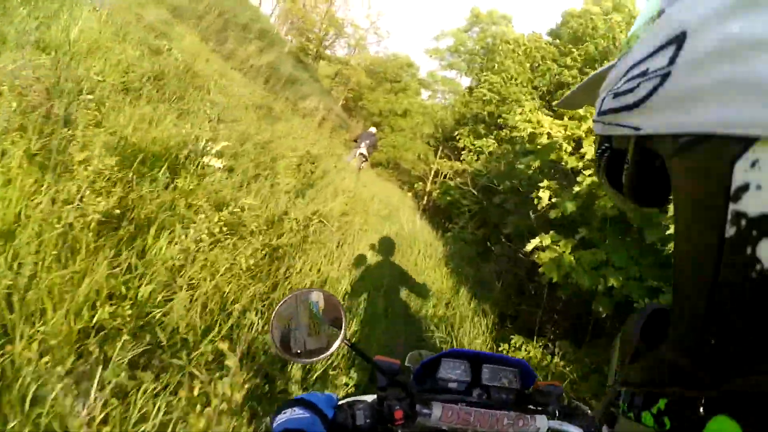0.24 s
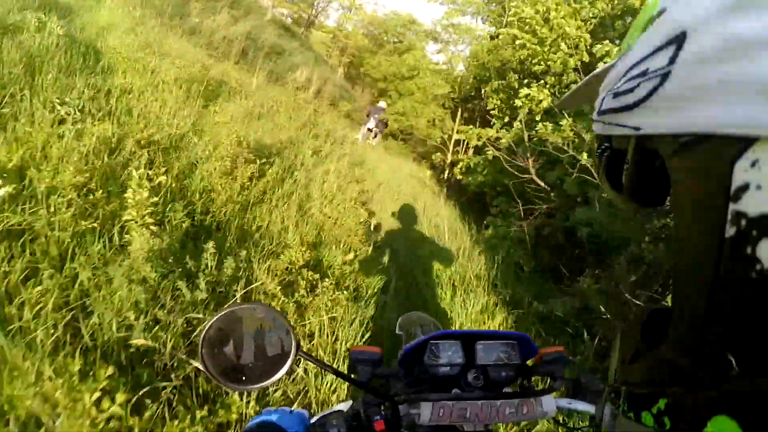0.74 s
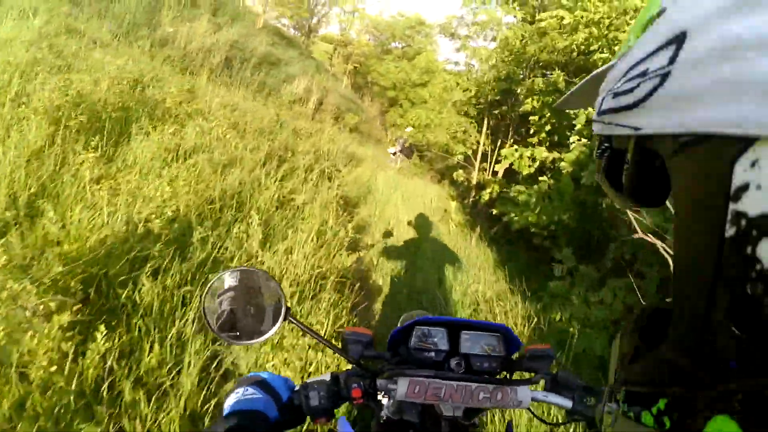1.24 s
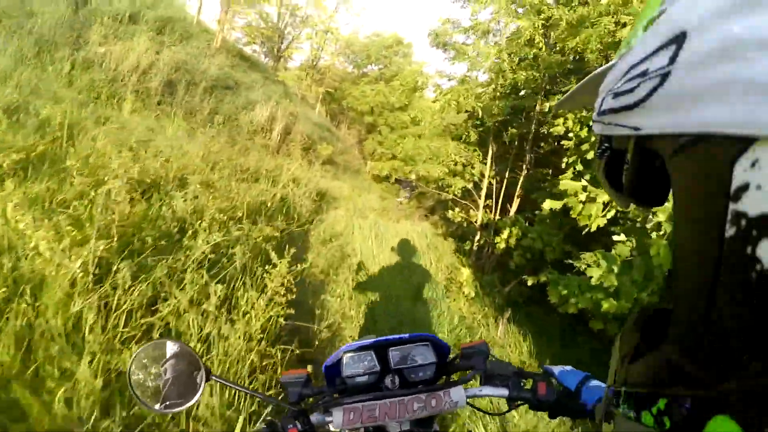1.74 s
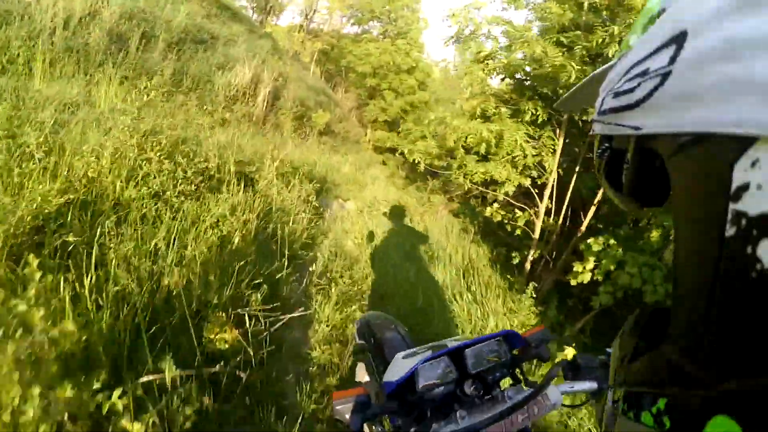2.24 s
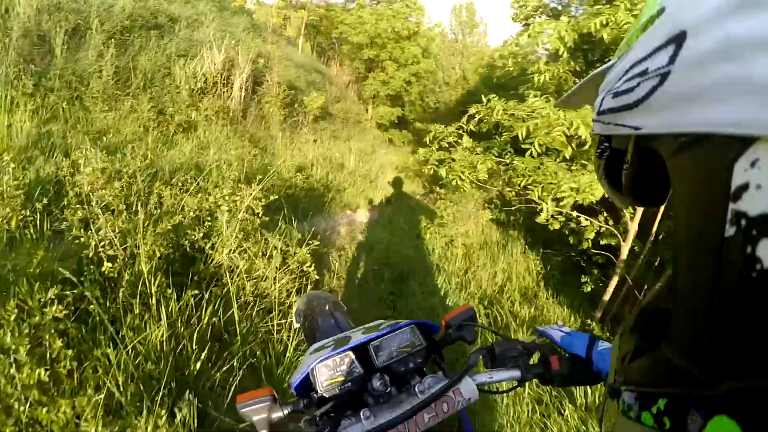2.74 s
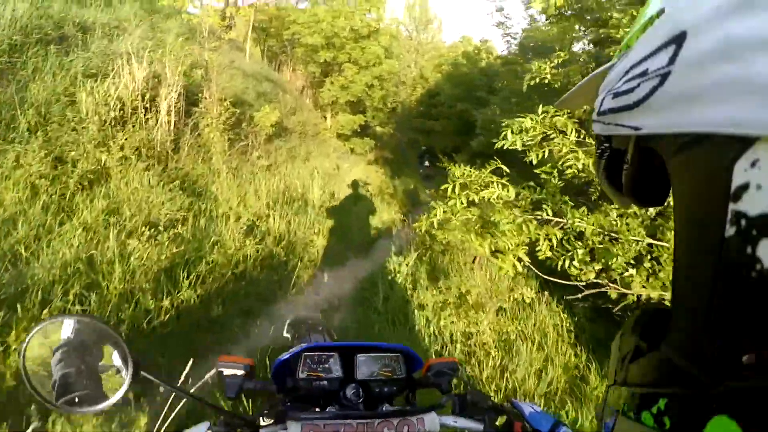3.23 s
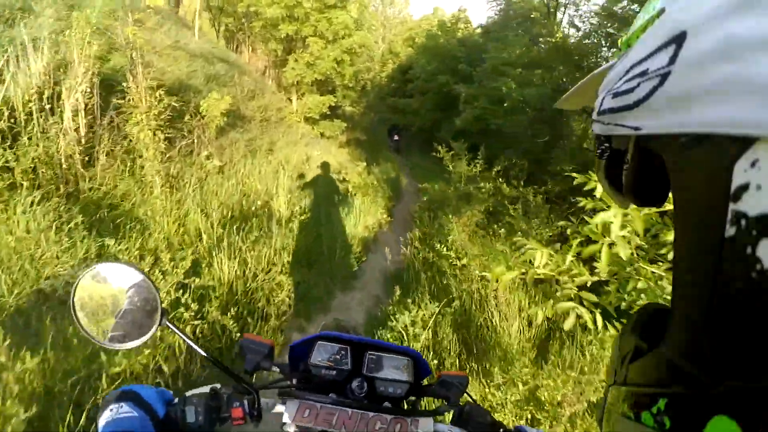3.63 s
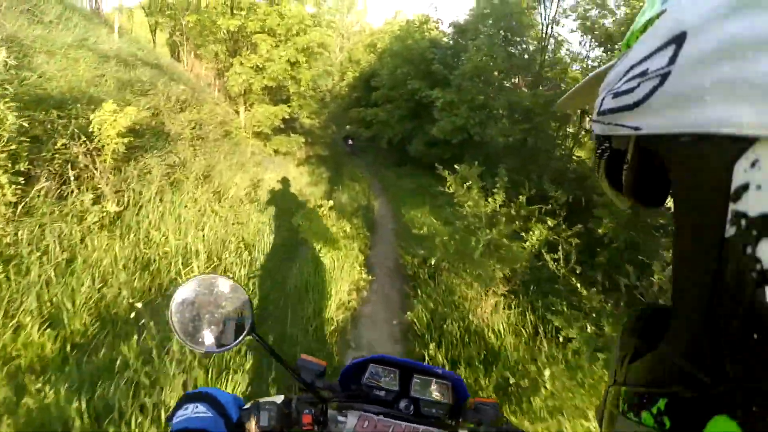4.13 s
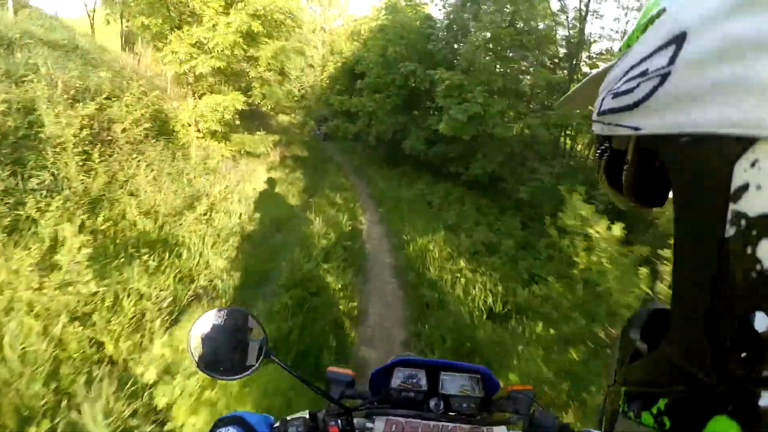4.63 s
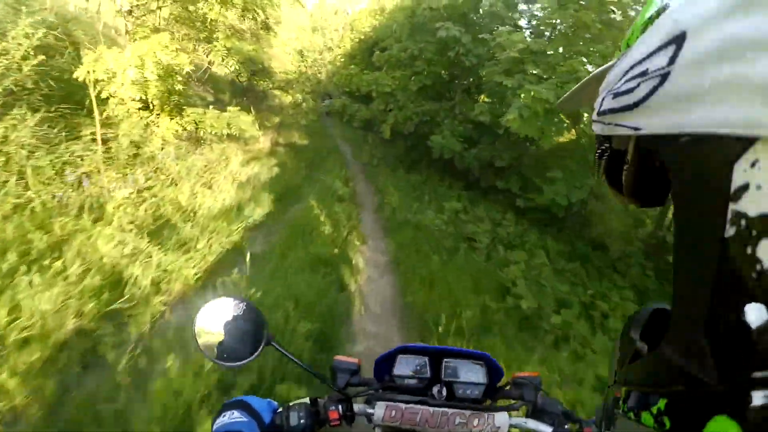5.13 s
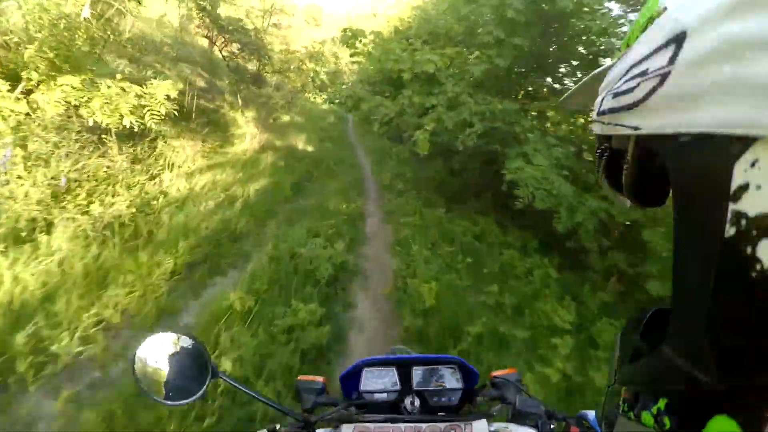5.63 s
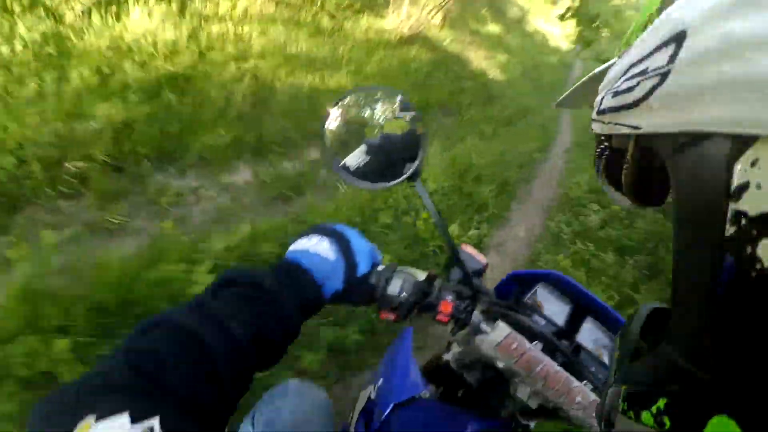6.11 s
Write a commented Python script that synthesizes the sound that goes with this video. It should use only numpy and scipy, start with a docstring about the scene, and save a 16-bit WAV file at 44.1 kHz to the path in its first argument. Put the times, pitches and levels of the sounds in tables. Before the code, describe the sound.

From the rider's helmet outdoors, a small two-stroke trail bike pulls gently with a nasal, rough buzz and thin metallic rattle, over low swaying wind. Small thuds and chain slaps come near 0.5 s. From about 0.9 s the throttle closes and the pitch slides down, the drone fading out by 1.9 s. At 2 s a big bump gives a very deep boom and wind buffet, with grass sweeping and a short faint brake squeal. From 2 to 4.7 s the bike coasts slowly with irregular soft pops and rasps, loose knocks, faint snapping stems and another weak squeal near 3.7 s. From 4.8 to 5.9 s it rolls faster: hollow chain slaps cluster, thuds land, pops continue and wind rumble grows. From 6 s to the end at about 6.4 s, hard knocks, gritty tyre scrubbing, a brief high brake scrape and a gust crowd together.

```python
"""Small two-stroke trail bike on rough grass

Heard from the rider's helmet: it pulls gently, the throttle closes, and it coasts on with stray pops.
Exhaust harmonics and gas noise pass through pipe resonances; piston slaps ring the metal as a rattle.
Bumps boom and knock and the chain slaps, as decaying tones and noise bursts through resonances.
Tyres, grass, twigs and a late scrub are shaped noise; brakes sing as wavering tones with scrape.
Wind is low noise that sways and rumbles on the microphone, growing with the pace and in gusts."""
import sys
import numpy as np
from scipy import signal
from scipy.fft import rfft, irfft, next_fast_len
from scipy.io import wavfile
from scipy.ndimage import uniform_filter1d

SR = 44100
rng = np.random.default_rng(int(sys.argv[2]) if len(sys.argv) > 2 else 0)


def generate_wav(sig):
    """Save sig (samples, or channels by samples) to the path in sys.argv[1] as 16-bit PCM at SR."""
    pcm = np.round(np.clip(np.atleast_2d(sig).T, -1, 1) * 32767).astype(np.int16)
    wavfile.write(sys.argv[1], SR, pcm)


N = 280917
TIME = np.arange(N) / SR  # s
HIT_SIZE = 8192  # samples in a short sound
TOP_HZ = 15200
SLOW_M_S, IDLE_HZ = 3, 21  # reference pace and reference turns per second

# levels at the slow pace [dB], and their rise for each doubling of speed [dB]; drive also follows the revs
GROUND_DB, GROUND_RISE_DB = -74, 15
DRIVE_DB, DRIVE_RISE_DB = -70.5, 5.5
WIND_DB, WIND_RISE_DB = -61.5, 9
SWAY_DB, SWAY_RISE_DB = -41.5, 3.5
# engine rattle at idle [dB], and its rise for each doubling of the revs [dB]
RATTLE_DB, RATTLE_RISE_DB = -70, 6
# weak firings: chance on each turn, then bark and rasp levels before scatter and the trims in pops()
WEAK_CHANCE, WEAK_DB, WEAK_RASP_DB = .15, -75, -65

# In swell tables, half length is the time from the height to a fall of 1/e.
# Resonance levels and spectrum levels are relative within their table.

# engine under power: (time [s], firing rate [Hz])
POWER_REVS = [(0.06, 57.15), (0.174, 55.55), (0.304, 55.0), (0.45, 56.2), (0.716, 56), (0.902, 54.43),
              (0.972, 52.87), (1.342, 45.06), (1.548, 39.9), (1.8, 34.38)]
# crank while coasting: (time [s], turns per second [Hz])
COAST_REVS = [(1.9, 32.08), (2.5, 27.29), (3.3, 20.78), (4.2, 21.31), (5, 25.88), (6.37, 31.46)]
# exhaust under power: (time [s], level [dB])
EXHAUST_LOAD = [(0, -60), (.92, -59.5), (1.1, -56), (1.38, -60), (1.68, -62.5), (1.76, -64.5), (1.9, -100)]
# pace over the ground: (time [s], speed [m/s])
GROUND_SPEED = [(0, 3.77), (1.2, 2.33), (2.0, 4.45), (3.0, 2.9), (3.95, 3.42), (4.65, 4.4), (5.0, 5.45),
                (5.7, 6.53), (6.37, 5.24)]

# exhaust resonances under power: (frequency [Hz], width at -6 dB [Hz], level [dB])
PIPE_MODES = [(111.5, 17, 2.5), (167.6, 23, -4), (230, 34, -7.5), (272.6, 40, 1.5), (303.2, 22.3, 10),
              (376, 32, -27), (461, 37, -18), (510.6, 36, 1.5), (557, 19, -1.5), (607, 49, 1.5),
              (671, 24, -1.5), (830, 56, -9), (938, 57, -1.5), (1030, 28, -5), (1070, 39, -14),
              (1105, 42, -6), (1350, 110, -11), (1480, 36, -19), (1630, 77, -11.5), (2020, 100, -29)]
# cylinder fins and casings: (frequency [Hz], width [Hz], level [dB])
METAL_MODES = [(1504, 49, -1.5), (1950, 25, -4), (2506, 94, 3), (2890, 180, -1), (3285, 144, 2),
               (3576, 580, 6), (4200, 195, 11), (5360, 400, -9), (6120, 120, -13), (6680, 690, -4.5),
               (7510, 270, -8), (8170, 200, -5), (10100, 320, -4.5), (11440, 1200, -5.5)]
# fins that sing in part of the rev range:
# (frequency [Hz], width [Hz], level [dB], at firing rate [Hz], spread as standard deviation [Hz])
SINGING_FINS = [(4220, 130, -69.5, 58.4, 3.2), (3224, 38, -70, 49.9, 3.8), (3480, 51, -76, 43.6, 7.3),
                (1870, 150, -74.5, 47.3, 6.8), (1340, 70, -77, 55.5, 3)]
# ring of a lone firing in the silencer: (frequency [Hz], width [Hz], level [dB])
BARK_MODES = [(163, 36, -7.5), (224, 21, -17.5), (296.7, 22.2, -6), (567.6, 54, 1), (629, 40, -5),
              (895, 79, -16), (1057, 25, -28)]
# ring of cylinder and airbox in a lone firing: (frequency [Hz], width [Hz], level [dB])
RASP_MODES = [(910, 70, 5.5), (1477, 120, -5), (1930, 91, 2.5), (2870, 520, 5.5), (3650, 320, 6),
              (4170, 160, 1), (7000, 790, -16), (8060, 160, -6), (11200, 2500, -24)]
# chain guard and swingarm: (frequency [Hz], width [Hz], level [dB])
GUARD_MODES = [(200, 45, 4), (583, 64, 3), (641, 51, 6.5), (714, 100, -26), (1062, 58, -5.5)]
# ring of the scrubbing tyre and rim: (frequency [Hz], width [Hz], level [dB])
TYRE_MODES = [(660, 63, -4), (860, 64, -5), (1076, 90, 2), (3280, 310, -7), (4300, 190, -7)]

# strong stray firings, before the trims in pops(): (time [s], bark peak [dB], rasp peak [dB])
STRONG_POPS = [(1.775, -57, -65), (1.833, -53.5, -76), (1.92, -48.5, -66), (2.015, -44.5, -61),
               (2.224, -49, -67), (2.46, -53, -58.5), (2.584, -48.5, -54.5), (2.724, -51, -67),
               (2.868, -51.5, -71), (3.009, -52.5, -70), (3.109, -49, -57), (3.256, -50, -53),
               (3.402, -52, -65), (3.502, -56, -75), (3.6, -51, -60), (3.744, -51, -56.5),
               (3.886, -52.5, -55.5), (4.032, -56, -65), (4.231, -47.5, -57.5), (4.372, -53, -62),
               (4.516, -52, -56.5), (4.663, -55, -61), (5.204, -54, -58), (5.35, -61, -59),
               (5.533, -51, -63), (5.581, -54, -58.5), (5.699, -58, -56), (5.898, -54, -57.5),
               (6.121, -49, -77)]
# loose parts knocking, before the trim in bumps():
# (time [s], peak [dB], decay [s], treble tilt [dB per octave])
LOOSE_KNOCKS = [(1.976, -51, 0.0059, -3), (2.101, -53, 0.0022, 5), (2.699, -53, 0.0041, 0),
                (2.957, -57, 0.0026, -8), (3.111, -48.5, 0.0053, 6), (3.308, -54, 0.0036, 3),
                (3.377, -56.5, 0.014, 3.5), (3.747, -61, 0.0066, 10), (3.913, -55, 0.016, -13),
                (4.977, -51, 0.0061, -5), (5.287, -51, 0.011, -8), (5.329, -53, 0.0051, -9),
                (5.811, -52, 0.009, -8), (6.066, -48, 0.0035, -15), (6.097, -54, 0.0037, -13),
                (6.114, -41.5, 0.0044, -13), (6.188, -53, 0.0055, -22), (6.254, -41, 0.0017, -13)]
# suspension thuds: (time [s], peak [dB], pitch [Hz])
SUSPENSION_THUDS = [(0.503, -53.5, 183), (0.619, -56, 198), (1.458, -60, 119.2), (2.025, -60.5, 190),
                    (2.055, -44, 111), (2.062, -51.5, 166), (2.065, -54, 239.5), (2.2, -59, 160),
                    (2.589, -64, 136), (2.955, -57.5, 191), (4.276, -53.5, 220), (4.87, -58, 186),
                    (4.963, -51, 212), (5.591, -61, 210.8), (5.786, -47, 160), (6.04, -58, 293),
                    (6.14, -51.5, 215), (6.2, -46, 182), (6.272, -53.5, 297), (6.342, -52, 302)]
# the helmet jolted by big bumps: (time at the height [s], half length [s], peak [dB], pitch [Hz])
HELMET_BOOMS = [(1.124, 0.027, -41.5, 36), (1.997, 0.037, -27, 30), (2.056, 0.03, -14, 14.3),
                (2.087, 0.038, -45, 48), (2.283, 0.094, -51, 40), (2.365, 0.025, -30, 26),
                (2.595, 0.055, -36, 16), (2.719, 0.068, -40.5, 29)]
# the slack chain slapping its guard over ruts: (time [s], peak [dB])
CHAIN_SLAPS = [(0.4, -54), (0.505, -51), (4.232, -56), (4.271, -53), (4.291, -56), (4.856, -59),
               (4.873, -47.5), (4.891, -50), (4.937, -47.5), (4.956, -46.5), (4.971, -58), (4.986, -52),
               (5.056, -60), (5.177, -47), (5.242, -53), (5.346, -53.5), (5.534, -47.5), (5.712, -49),
               (5.725, -47.5), (5.788, -44.5), (5.808, -48), (5.841, -54), (5.855, -52), (5.883, -49)]
# brakes singing briefly: (start [s], length [s], pitch [Hz], level at the height [dB])
BRAKE_SQUEALS = [(2.146, 0.14, 914, -64), (3.643, 0.33, 892, -74), (6.272, 0.055, 5500, -69)]
# tyres scrubbing into the turn: (time at the height [s], half length [s], level [dB])
TYRE_SCRUBS = [(6.08, 0.059, -56), (6.194, 0.01, -54), (6.275, 0.06, -55.5), (6.345, 0.029, -52),
               (6.378, 0.025, -46.5)]
# tall grass sweeping along the bike: (time at the height [s], half length [s], level [dB])
GRASS_SWEEPS = [(2.2, 0.16, -63), (2.24, 0.034, -58), (2.85, 1, -74.5), (5.4, 0.7, -77.5),
                (6.29, 0.067, -71), (6.37, 0.021, -64)]
# gusts on the microphone, the sway stretched further in wind():
# (time at the height [s], half length [s], rumble [dB], slow sway [dB])
WIND_GUSTS = [(0, 0.035, -49, -35.5), (0.148, 0.059, -55, -70), (0.607, 0.05, -61, -32.5),
              (0.852, 0.028, -49, -45), (1.274, 0.45, -57, -42.5), (1.844, 0.033, -46, -49),
              (2.034, 0.046, -32, -18), (2.274, 0.16, -43, -26.5), (2.618, 0.067, -53, -26.5),
              (3.114, 0.19, -55.5, -30.5), (3.477, 0.15, -62, -36), (4.134, 0.044, -54, -45),
              (4.288, 0.1, -64, -32.5), (4.987, 0.14, -50, -53), (5.359, 0.33, -52.5, -32.5),
              (5.606, 0.054, -50, -34.5), (5.924, 0.15, -45.5, -34.5), (6.214, 0.016, -53, -17),
              (6.275, 0.05, -40, -36)]

# slow pressure sway of the wind: (frequency [Hz], spectrum level [dB])
SWAY_COLOUR = [(1, -2), (4, -8.5), (7, 1), (11, 1), (18, -15), (30, -45.5), (60, -138.5)]
# wind rumble: (frequency [Hz], spectrum level [dB])
RUMBLE_COLOUR = [(10, -32), (22, -2), (40, -2), (53, -8), (68, -50.5), (110, -28.5), (600, -111)]
# tyres drumming on the ground: (frequency [Hz], spectrum level [dB])
GROUND_COLOUR = [(30, -26), (65, 6), (105, 7.5), (150, -1), (220, -6.5), (380, -49), (1000, -41.5)]
# chain and gears churning: (frequency [Hz], spectrum level [dB])
DRIVE_COLOUR = [(120, -28), (230, 2), (305, 5), (385, -11), (500, 1.5), (680, 0.5), (780, -5), (900, -1.5),
                (1060, 1), (1230, -10), (1500, -6.5), (2050, -18), (5000, -16), (15000, -33)]
# hiss of a knocking part: (frequency [Hz], spectrum level [dB])
HISS_COLOUR = [(500, -28), (1500, -2), (2800, 1.5), (4300, 18), (5500, -12), (8300, 16), (9300, -33),
               (10500, -22), (15000, -46)]
# grass and snapping stems: (frequency [Hz], spectrum level [dB])
GRASS_COLOUR = [(800, -41), (2500, -11.5), (4200, -0.5), (6000, -10.5), (8300, -10.5), (11000, -17.5),
                (15000, -19.5)]
# grit under the scrubbing tyres: (frequency [Hz], spectrum level [dB])
SCRUB_COLOUR = [(250, -26), (550, 0), (800, 7.5), (1100, 14.5), (1600, 3), (2500, 2), (4000, 3),
                (5000, -5.5), (7000, -25), (10000, -37), (15000, -32)]


def exhaust(hz, turns, gas_db=-10.5, gas_turns=0.97, waver_db=4.5, dull_db=14, odd_db=-4, count=36):
    """The harmonics of the firing rate slide through the pipe's resonances; rough gas follows each firing."""
    grid = np.arange(1, SR / 8)
    pipe = pipe_gain(grid)
    live = TIME < EXHAUST_LOAD[-1][0]
    revs = hz[live]
    strength = flutter(50, 1.6)[live]
    tone = np.zeros(N)
    for k in range(1, count + 1):
        # random phases: the silencer smears each firing over the whole turn
        phase = 2 * np.pi * (k * turns[live] + rng.random())
        # the low harmonics hold steady, the upper ones waver
        unsteady = np.clip((k - 7) / 10, .12, 1.1)
        waver = (strength * flutter(22.504, waver_db)[live]) ** unsteady
        # the harmonics above 600 Hz fade as the revs fall
        octaves_up = np.log2(np.maximum(k * revs / 600, 1))
        dull = undb(dull_db * np.log2(revs / hz[0]) * octaves_up)
        # the port opens and shuts on each turn: two jolts, which favour the even harmonics
        parity = undb(odd_db * (k % 2))
        tone[live] += parity * np.interp(k * revs, grid, pipe) * dull * waver * np.sin(phase)
    puffs = noise() * np.exp(-(turns % 1) / gas_turns)
    puffs = colour(puffs, [(100, 1), (200, -6.5), (350, -12), (600, 2.5), (1000, 0.5), (1500, 14.0),
                           (2500, -11), (6000, -5)])
    puffs = padded(puffs)
    gas = irfft(rfft(puffs) * pipe_gain(freqs(puffs)))[:N]
    # the gas flow falls with the revs
    flow = undb(gas_db) * unit(gas) * (hz / hz[0]) ** 2
    return (even(tone, 0.075) + flow) * undb(curve(EXHAUST_LOAD))


def pipe_gain(f):
    """Each resonance acts twice, in pipe and silencer, so the valleys between them are deep."""
    return sum(undb(db) / (1 + ((f * f - hz * hz) / (f * width)) ** 2) for hz, width, db in PIPE_MODES)


def pumping(turns, level_db=-75, puff_turns=0.62, speed_db=0.41, shut_s=1.04):
    """With the throttle closing, the piston still pumps a soft puff of air through the pipe on every turn."""
    puffs = noise() * np.exp(-(turns % 1) / puff_turns) * flutter(25, 1.8)
    air = ring(puffs, [(306.0, 64, 2.5), (387.0, 21, -3.5), (422.0, 19, -16), (652.0, 180, -6),
                       (856.0, 24, 1.5), (1410, 46, -22)])
    air = colour(air, [(950, 11), (1200, -15), (1450, 5), (2000, -26)])
    closed = np.clip(TIME - shut_s, 0, 1)  # fades in over one second
    revs = curve(COAST_REVS)
    return unit(air) * undb(level_db + speed_db * (revs - revs.min())) * closed


def rattle(hz, turns, slap_turns=0.33, slap=1.5, scatter_db=6.5):
    """The piston slaps twice a turn and rings the metal, louder with the revs; some fins sing at certain revs."""
    slap_decay = np.exp(-(2 * turns % 1) / slap_turns)
    slaps = 1.5 + slap * slap_decay * np.tanh(flutter(60, scatter_db))
    metal = ring(noise() * slaps * flutter(35, 1.0), METAL_MODES)
    metal = colour(metal, [(500, 12), (1400, 4), (9000, -2.5), (12500, -10.0), (15000, -7.5)])
    out = metal * undb(RATTLE_DB + RATTLE_RISE_DB * np.log2(hz / IDLE_HZ))
    for fin_hz, width, db, revs, spread in SINGING_FINS:
        fin = ring(noise() * slaps * flutter(47.9, 2.0), [(fin_hz, width, 0)])
        fin = ring(fin, [(fin_hz, 600, 0)])  # a broad second pass thins the skirts
        near = np.exp(-((hz - revs) / spread) ** 2 / 2)
        out = out + unit(fin) * undb(db) * near
    return out


def pops(crank_hz, turns, bark_trim_db=-1, rasp_trim_db=6.0, crackle_db=16, vary_db=2, lead_s=.001,
         gas_share=0.35, tilt_db=2.2, even_hz=28):
    """Unburnt charge fires now and then: a soft bark in the pipe and a rasp from the cylinder."""
    out = np.zeros(N)
    t = TIME[:HIT_SIZE]
    for s, bark_db, rasp_db in list(STRONG_POPS) + weak_firings(turns):
        # a slow crank opens the port gently, so the bark is deeper
        tilt = tilt_db * np.clip(np.interp(s, TIME, crank_hz) - even_hz, -2, 4)  # dB per octave
        bark = 0
        for hz, width, gain in BARK_MODES:
            size = undb(gain + tilt * np.log2(max(hz / 300, 1)) + rng.standard_normal())
            phase = hz * (1 + 0.0089 * rng.standard_normal()) * t + rng.random()
            bark = bark + size * np.exp(-np.pi * width * t) * np.sin(2 * np.pi * phase)
        bark = bark * (1 - np.exp(-(t / 0.0052) ** 2))
        gas = colour(burst(0.0017, 0.0088), [(100, -33), (300, -8), (650, 7.0), (1000, -1.0), (2000, 10.5)])
        gas = ring(gas, BARK_MODES)
        add(out, s - lead_s, peak(unit(bark) + gas_share * unit(gas), bark_db + bark_trim_db))
        # the charge burns in crackles, and no two firings ring alike
        crackle = burst(0.0017, 0.018) * undb(crackle_db * np.tanh(noise(HIT_SIZE) / 2))
        modes = [(hz, width, gain + vary_db * rng.standard_normal()) for hz, width, gain in RASP_MODES]
        add(out, s - lead_s, peak(ring(crackle, modes), rasp_db + rasp_trim_db))
    return out


def weak_firings(turns, scatter_db=2):
    """Once the throttle is shut, any turn of the crank may fire feebly: rows like those of STRONG_POPS."""
    starts = TIME[1:][np.diff(np.floor(turns)) > 0]
    starts = starts[starts > POWER_REVS[-1][0]]
    luck = rng.random(256)
    spread = scatter_db * noise(256)
    return [(s, WEAK_DB + off, WEAK_RASP_DB + off)
            for s, draw, off in zip(starts, luck, spread) if draw < WEAK_CHANCE]


def booms():
    """The big bumps shake the helmet through a few deep swings."""
    return sum(swells([(s, half_s, db)]) * np.cos(2 * np.pi * hz * (TIME - s))
               for s, half_s, db, hz in HELMET_BOOMS)


def bumps(knock_trim_db=2.5, hiss=0.99, snap=3.8):
    """Ruts thump the frame and make loose parts knock."""
    out = np.zeros(N)
    for s, db, decay_s, tilt in LOOSE_KNOCKS:
        # one hard strike amid a short chatter of the part
        strike = signal.unit_impulse(HIT_SIZE, 64)
        contact = snap * strike + burst(0.0011, decay_s)
        knock = unit(ring(contact, METAL_MODES)) + hiss * colour(contact, HISS_COLOUR)
        slope = [(2500, -tilt), (10000, tilt)]  # two octaves apart
        add(out, s, peak(colour(knock, slope), db + knock_trim_db))
    for s, db, hz in SUSPENSION_THUDS:
        add(out, s, peak(thump(hz), db))
    return out


def thump(hz, rise_s=0.0079, decay_s=0.016, rough=1.0):
    """The suspension takes a blow and the frame swings a few times at one pitch, with a rough noisy push."""
    t = TIME[:HIT_SIZE]
    swing = np.sin(2 * np.pi * hz * t) * (1 - np.exp(-(t / rise_s) ** 2)) * np.exp(-t / decay_s)
    push = colour(burst(0.0026, 0.013), [(50, 6), (100, 12.5), (260, -0.5), (400, -7.5), (2000, -5)])
    return unit(swing) + rough * unit(ring(push, [(hz, 130, 0)]))


def chain(scatter_db=-1.0, detune=0.015, contact_s=0.0026, lead_s=0.00099, tick_db=-13):
    """Ruts whip the slack chain against its guard in hollow knocks; each lands on another spot."""
    out = np.zeros(N)
    t = TIME[:HIT_SIZE]
    for s, db in CHAIN_SLAPS:
        knock = 0
        for hz, width, gain in GUARD_MODES:
            phase = hz * (1 + detune * rng.standard_normal()) * t
            size = undb(gain + scatter_db * rng.standard_normal())
            knock = knock + size * np.exp(-np.pi * width * t) * np.sin(2 * np.pi * phase)
        soft_contact = 1 - np.exp(-(t / contact_s) ** 2)
        add(out, s - lead_s, peak(knock * soft_contact, db))
        tick = ring(burst(0.0013, 0.015), METAL_MODES)
        add(out, s - lead_s, peak(tick, db + tick_db))
    return out


def squeals(width_hz=35, rough=0.8, waver_db=3.0, wobble_hz=18):
    """A brake drags and sings on one unsteady note, grainier the higher it is."""
    out = np.zeros(N)
    for s, length_s, hz, db in BRAKE_SQUEALS:
        swell = np.sin(np.pi * np.clip((TIME - s) / length_s, 0, 1))
        pitch = hz + wobble_hz * wander(120)
        note = flutter(76, waver_db) * np.sin(2 * np.pi * np.cumsum(pitch) / SR)
        # the scrape is width_hz wide at 1 kHz and widens with the pitch
        scrape = unit(ring(noise(), [(hz, width_hz * hz / 1000, 0)]))
        out += undb(db) * swell * unit(note + rough * np.sqrt(hz / 1000) * scrape)
    return out


def rolling(turns_hz, chain_rise_db=3):
    """Tyres drum on the ground while chain and gears churn; both grow with the pace, the gears also with revs."""
    ground = even(colour(noise() * flutter(30, 2.0), GROUND_COLOUR), 0.36)
    drive = colour(noise() * flutter(70, 2.67), DRIVE_COLOUR)
    revs_gain = undb(chain_rise_db * np.log2(turns_hz / IDLE_HZ))
    return ground * paced(GROUND_DB, GROUND_RISE_DB) + drive * paced(DRIVE_DB, DRIVE_RISE_DB) * revs_gain


def brushing(grit_db=6, lug_db=2.5, carcass=0.43):
    """Stalks flick along the bike as grainy noise; grit scrubs under the tyres as flickering noise and rings them."""
    stalks = noise() * flutter(500, 2.8)
    # the fastest flutter ends after about 4.5 s and holds one gain; the slower one flickers through the scrub
    stones = noise() * flutter(900, grit_db) * flutter(90, lug_db)
    crunch = colour(stones, SCRUB_COLOUR) + carcass * unit(ring(stones, TYRE_MODES))
    return colour(stalks, GRASS_COLOUR) * swells(GRASS_SWEEPS) + unit(crunch) * swells(TYRE_SCRUBS)


def twigs(level_db=-80, spread_db=3.0, count=300):
    """Dry stems snap against the bike in the tall grass: many faint ticks and a few clear ones."""
    ticks = np.zeros(N)
    places, sizes = rng.random((count, 2)).T
    ticks[(places * N).astype(int)] = undb(-spread_db * np.log(np.maximum(sizes, .03)))
    snaps = signal.fftconvolve(ticks, burst(0.00044, 0.004))[:N]
    return colour(snaps, GRASS_COLOUR) * swells([(3.1, 0.49, level_db)])


def wind(linger=1.45):
    """Large slow eddies sway the pressure at the helmet, smaller ones rumble; both grow with pace and gusts."""
    gusts = np.array(WIND_GUSTS)
    sway_gain = np.hypot(paced(SWAY_DB, SWAY_RISE_DB), swells(gusts[:, [0, 1, 3]], linger))
    rumble_gain = np.hypot(paced(WIND_DB, WIND_RISE_DB), swells(gusts[:, :3]))
    sway = even(colour(noise(), SWAY_COLOUR), 0.16)
    rumble = even(colour(noise(), RUMBLE_COLOUR), 0.066)
    return sway * sway_gain + rumble * rumble_gain


def undb(db):
    """Decibels to gain."""
    return 10 ** (np.asarray(db) / 20)


def curve(rows, axis=1):
    """One column of a table, joined by straight lines."""
    rows = np.array(rows)
    return np.interp(TIME, rows[:, 0], rows[:, axis])


def paced(db, rise_db):
    """A gain that grows with the speed over the ground."""
    return undb(db + rise_db * np.log2(curve(GROUND_SPEED) / SLOW_M_S))


def swells(rows, stretch=1):
    """A gain that rises and falls in one smooth bell for each row; overlaps add as power."""
    return np.sqrt(sum((undb(db) * np.exp(-((TIME - s) / (half_s * stretch)) ** 2)) ** 2
                       for s, half_s, db in rows))


def wander(rate):
    """A bounded random line that changes course rate times a second, holding still after 4096 points."""
    knots = 2 * np.tanh(noise(4096) / 2)
    return np.interp(TIME * rate, np.arange(len(knots)), knots) / np.std(knots)


def flutter(rate, depth_db):
    """A gain that wanders at random."""
    return undb(depth_db * wander(rate))


def noise(size=N):
    """White noise."""
    return rng.standard_normal(size)


def burst(rise_s, decay_s):
    """A puff of noise that swells and dies away."""
    t = TIME[:HIT_SIZE]
    return noise(HIT_SIZE) * (1 - np.exp(-(t / rise_s) ** 2)) * np.exp(-t / decay_s)


def unit(x):
    """Scale to rms 1."""
    return x / np.sqrt(np.mean(x ** 2))


def even(x, span_s):
    """Scale to a running rms of about 1."""
    size = int(span_s * SR)
    power = uniform_filter1d(uniform_filter1d(x ** 2, size), size)
    return x / np.sqrt(np.abs(power) + 1e-12)


def peak(x, db):
    """Scale to a peak level."""
    return x * undb(db) / np.abs(x).max()


def add(out, s, x):
    """Mix a short sound in at time s."""
    start = max(int(s * SR), 0)
    out[start:start + len(x)] += x[:max(N - start, 0)]


def freqs(x):
    """Frequency of each spectral bin, kept above zero."""
    return np.maximum(np.arange(len(x) // 2 + 1) * SR / len(x), .1)


def padded(x):
    """Add silence for tails to ring into."""
    return np.pad(x, (0, 2 * next_fast_len(len(x) // 2 + HIT_SIZE // 2) - len(x)))


def ring(x, modes):
    """Pass through a bank of resonances."""
    f = freqs(padded(x))
    response = sum(undb(db) / (1 + 1j * (f * f - hz * hz) / (f * width)) for hz, width, db in modes)
    return irfft(rfft(padded(x)) * response)[:len(x)]


def colour(x, points):
    """Shape with a smooth spectrum; rms 1."""
    hz, db = np.transpose(points)
    gain = undb(np.interp(np.log(freqs(padded(x))), np.log(hz), db))
    return unit(irfft(rfft(padded(x)) * gain)[:len(x)])


def scene():
    """The crank drives exhaust, pumping, rattle and pops; track and wind join them."""
    hz = curve(list(POWER_REVS) + list(COAST_REVS))
    turns = np.cumsum(hz) / SR
    engine = exhaust(hz, turns) + pumping(turns) + rattle(hz, turns) + pops(hz, turns)
    jolts = booms() + bumps() + chain() + squeals()
    background = rolling(hz) + brushing() + twigs() + wind()
    return (engine + jolts + background)[None]


def record(dry):
    """A steep low-pass at the helmet's microphone cuts the top."""
    return signal.sosfilt(signal.ellip(14, .2, 70, TOP_HZ, fs=SR, output="sos"), dry)


dry = scene()
out = record(dry)
generate_wav(out)
```